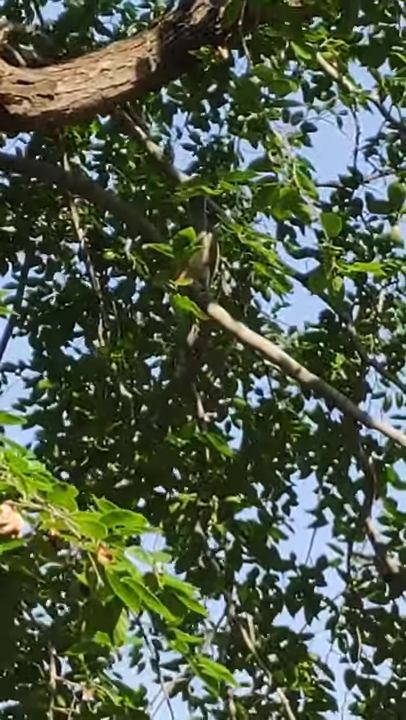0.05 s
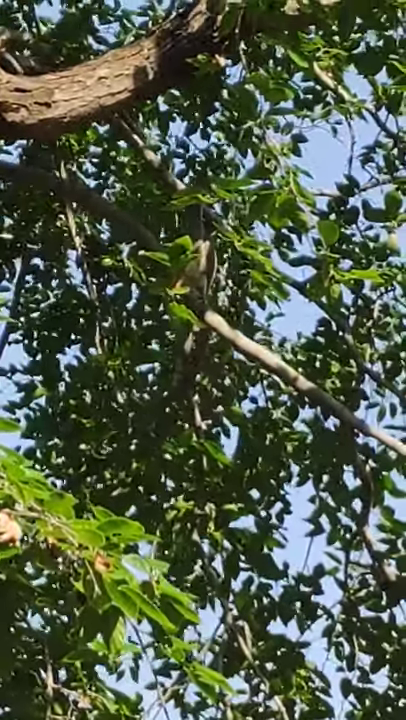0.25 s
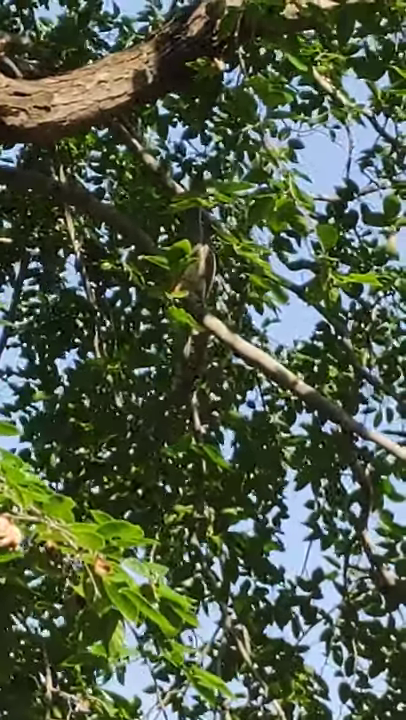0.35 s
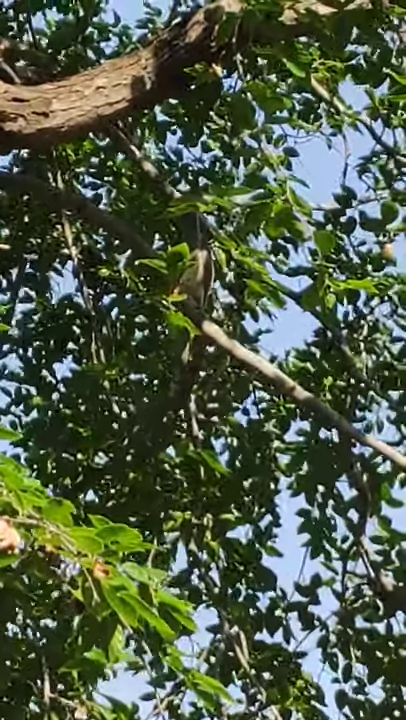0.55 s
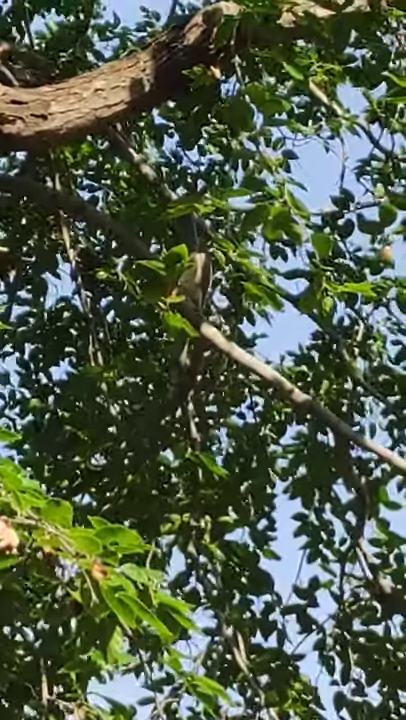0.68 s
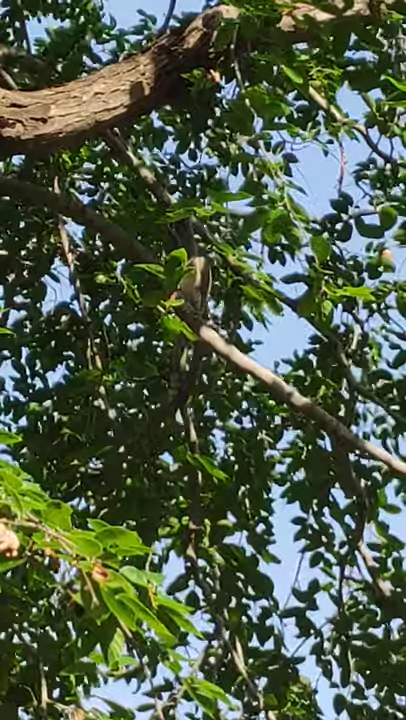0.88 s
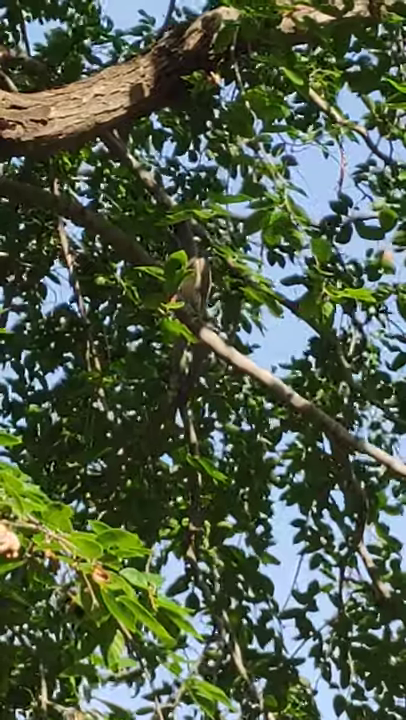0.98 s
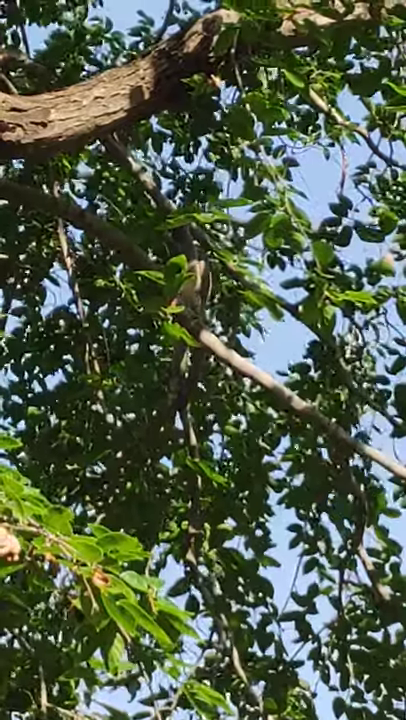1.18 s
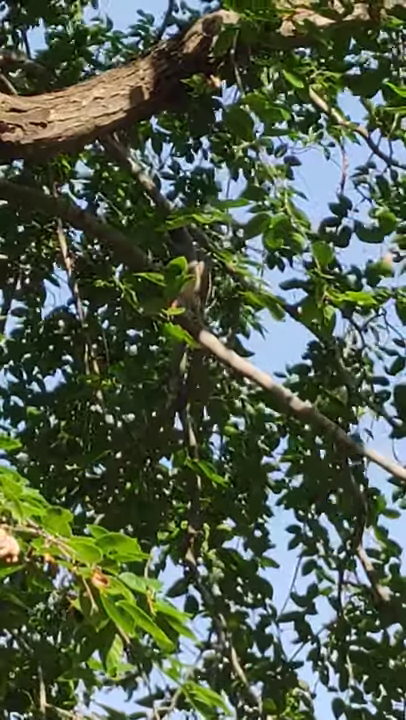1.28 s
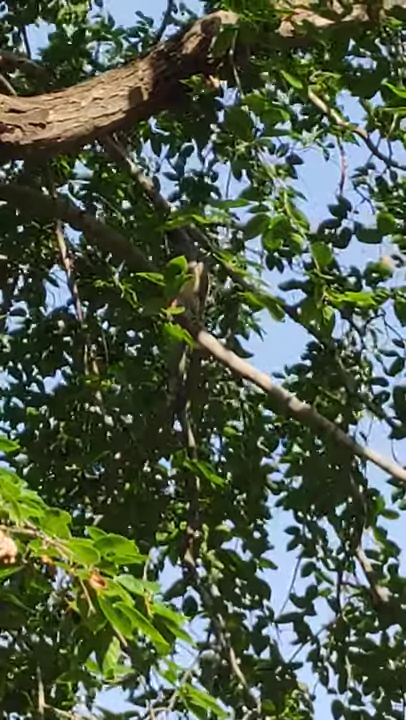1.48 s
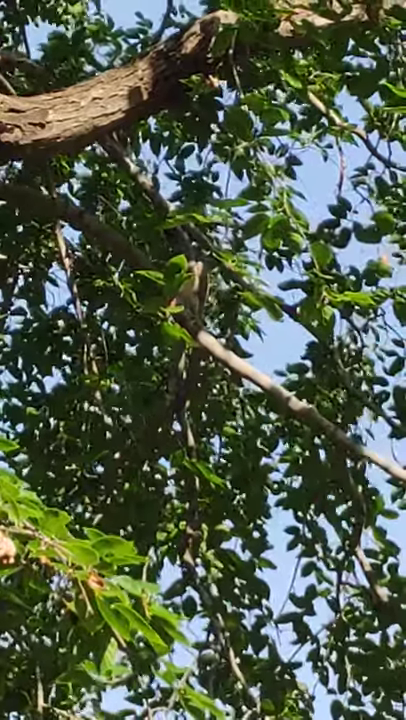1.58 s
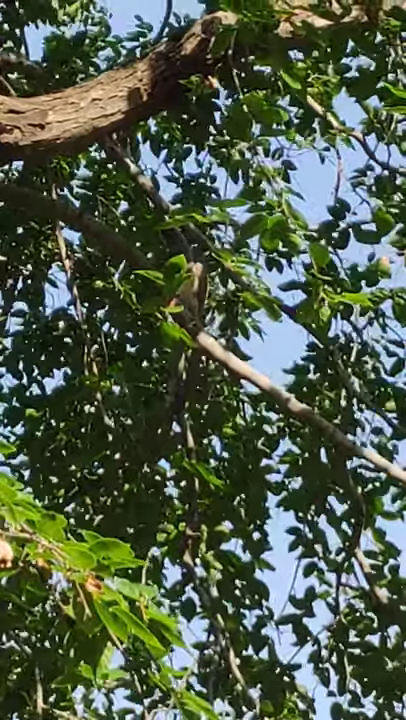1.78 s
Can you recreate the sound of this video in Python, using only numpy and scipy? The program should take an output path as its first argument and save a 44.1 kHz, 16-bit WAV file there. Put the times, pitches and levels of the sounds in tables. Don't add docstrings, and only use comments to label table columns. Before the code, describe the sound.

One sharp bird call rings out in leafy trees, followed by distant thin whistles and trills

```python
import sys
import numpy as np
from scipy import signal
from scipy.fft import rfft, irfft
from scipy.io import wavfile
from scipy.ndimage import uniform_filter1d

SR = 44100
rng = np.random.default_rng(int(sys.argv[2]) if len(sys.argv) > 2 else 0)


def materialize(psi):
    bounded = np.clip(np.atleast_2d(psi).T, -1, 1)
    quanta = np.round(bounded * 32767).astype(np.int16)
    wavfile.write(sys.argv[1], SR, quanta)


def ratio(d):
    e = np.asarray(d, float) / 20
    return 10 ** e


N = 81585


def on_log(hz, table):
    t = np.array(table, float)
    return np.interp(np.log(np.maximum(hz, 1)), np.log(t[:, 0]), t[:, 1])


def shaped(x, gain):
    return irfft(rfft(x) * gain(np.fft.rfftfreq(N, 1 / SR)), N)


def noise(gain):
    return shaped(rng.standard_normal(N), gain)


def unit(x):
    return x / np.sqrt(np.mean(x ** 2))


def walk(rate):
    k = int(SR / rate)
    return unit(uniform_filter1d(uniform_filter1d(rng.standard_normal(N), k), k))


# (frequency [Hz], level [dB])
SCATTER_COLOUR = [(1500, -1.5), (3000, -3), (4300, -1.5), (5100, 5), (8600, 2), (13000, 7), (16000, -8)]


def scatter(x, start, t60, db):
    t = np.arange(int(.7 * SR)) / SR
    fade_in = np.clip(t / start - 1, 0, 1)
    tail = rng.standard_normal((2, len(t))) * fade_in * ratio(-60 * t / t60)
    tail = tail * ratio(db) / np.sqrt(np.sum(tail ** 2, axis=1, keepdims=True))
    wet = signal.fftconvolve(x[None], tail, axes=1)[:, :N]
    return shaped(wet, lambda hz: ratio(on_log(hz, SCATTER_COLOUR)))


# (frequency [Hz], density [dB per Hz])
AIR_COLOUR = [(15, -29), (25, 6.5), (129, -8.5), (260, -17.5), (1180, -22), (1810, -31), (5320, -28.5),
              (5770, -28), (15600, -38.5)]
# (frequency [Hz], level [dB])
AIR_LEFT = [(100, -1.5), (400, -2), (2400, 1), (8000, 2), (15000, 7.5)]
# (frequency [Hz], correlation [0 to 1])
AIR_ALIKE = [(130, .97), (300, 0.92), (640, 0.7), (1400, 0.01), (15000, 0.034)]


def air():
    def alike(hz):
        return np.clip(on_log(hz, AIR_ALIKE), 0, 1)

    def ear(sign):
        def gain(hz):
            return ratio(on_log(hz, AIR_COLOUR) + sign * on_log(hz, AIR_LEFT) / 2) * (hz > 18)
        return shaped(mid + sign * side, gain)

    mid = noise(lambda hz: np.sqrt(1 + alike(hz)))
    side = noise(lambda hz: np.sqrt(1 - alike(hz)))
    ears = unit(np.array([ear(1), ear(-1)]))
    out = 0
    for octave in range(4, 15):
        band = shaped(ears, lambda hz: np.clip(1 - np.abs(np.log2(hz + 1) - octave), 0, 1))
        flicker_db = 1.3 * walk(5.5)
        out = out + band * ratio(flicker_db)
    return ratio(-56) * out


# (frequency [Hz], width [Hz], level [dB])
HUM = [
    (58.8, 47, -63.5),
    (114.5, 9.2, -74.5),
    (688, 115, -77.5),
]


def machinery():
    hum = np.zeros(N)
    for centre, width, db in HUM:
        hum = hum + ratio(db) * unit(noise(lambda hz: np.exp(-((hz - centre) / width) ** 2)))
    return hum


def far_tones(shape, calls):
    t, out = np.arange(N) / SR, np.zeros((3, N))
    s, hz, shape_db = np.array(shape, float).T
    for start, db, pan_db, factor in calls:
        pitch = factor * np.interp(t - start, s, hz)
        gain = ratio(db + np.interp(t - start, s, shape_db, left=-200, right=-200))
        tone = np.sqrt(2) * np.sin(2 * np.pi * np.cumsum(pitch) / SR) * uniform_filter1d(gain, size=80)
        out = out + np.array([tone * ratio(pan_db / 2), tone * ratio(-pan_db / 2), tone])
    return out


# (time [s], pitch [Hz], level [dB])
TICK = [(0, 7800, -6.5), (.004, 7460, -1.5), (.008, 7350, -15.5), (.011, 6800, -5), (.013, 6860, -9)]
# (time [s], level [dB], pan to left [dB], pitch factor [ratio])
TICKS = [(-.015, -65, 0, 1), (0.01, -53.5, 0.0057, 1.005), (0.04, -55, 0, 1.065), (0.068, -65, 0, 1.17),
         (0.095, -55.5, 0, 0.96), (0.124, -72, 0, 0.76), (.18, -80, 0, 1.5), (.925, -73, 0, 1.8),
         (.95, -65, 0.0081, 1.01), (.975, -73, 0, 1.04), (0.999, -69, 0, 0.87), (1.026, -73, 0, 0.93),
         (1.598, -63, 0.0025, 1.07), (1.628, -60.5, 0.0065, 1), (1.651, -68, 0, 1.2),
         (1.676, -61, 0.0013, 1.01), (1.699, -74, 0, 1.04), (1.724, -60, 0, 1), (1.748, -60.5, 0, 1.04),
         (1.772, -75, 0.00072, 1.2)]


def ticking_trill():
    return far_tones(TICK, TICKS)


# (time [s], pitch [Hz], level [dB])
CLIMB = [(0, 1880, 0), (.04, 2050, -8.5), (.062, 2280, 5), (.075, 2600, -23), (.1, 2930, 5),
         (.108, 3080, -7)]
# (time [s], level [dB], pan to left [dB], pitch factor [ratio])
CLIMBS = [
    (0.012, -79, -2, 1),
    (0.414, -78.5, -2, 0.97),
    (.815, -77.5, -1.7, 0.95),
    (1.213, -75, -2.3, 0.99),
    (1.615, -74.5, -1.8, 0.97),
]


def climbing_phrase():
    return far_tones(CLIMB, CLIMBS)


# (time [s], pitch [Hz], level [dB])
PEEP = [(0, 6000, 2), (.004, 5850, 4), (.008, 5540, -7), (.013, 6100, -4)]
# (time [s], level [dB], pan to left [dB], pitch factor [ratio])
PEEPS = [
    (0.013, -72, 1.2, 0.92),
    (.045, -64.5, 1.1, 0.98),
    (0.072, -63.5, 1, 1.06),
    (0.101, -67.5, 1.1, 0.84),
    (0.136, -69, 1, 1.01),
    (0.161, -72, 1, 0.79),
    (0.726, -70, 2.4, 0.58),
]


def peeping():
    return far_tones(PEEP, PEEPS)


# (frequency [Hz], level [dB])
THROAT = [(900, -30), (2000, -16.5), (3200, 3.5), (4300, 2.5), (5200, 4.5), (6500, -1), (8600, -3.5),
          (14000, -33.5)]
# (frequency [Hz], level [dB])
RASP = [(1500, -22), (3000, -5), (5000, 1), (9000, 5), (12000, -18), (16000, -19)]
# (level [dB]) at harmonic 1.5, 2.5, 3.5 and so on, blended between
OVERTONES = [-1, 1, 1.5, -10, -1.5, 4, -7]


def note(rows, jitter, flutter_db, rasp_db):
    n = SR // 2
    t = np.arange(n) / SR
    s, hz, db, slope = np.array(rows, float).T
    f = np.interp(t, s, hz) * (1 + jitter * walk(660)[:n])
    phase = 2 * np.pi * np.cumsum(f) / SR
    k = np.arange(1, 17)[:, None]
    flutter = np.tanh(walk(330)[(np.arange(n) + 3500 * k) % N]) * np.log2(k)
    syrinx_db = np.interp(k, np.arange(len(OVERTONES)) + 1.5, OVERTONES)
    tilt_db = np.interp(t, s, slope) * np.log2(k)
    stack = ratio(syrinx_db + on_log(k * f, THROAT) + tilt_db + flutter_db * flutter)
    smear = 0.12 * flutter[:, ::-1] * flutter_db
    stack = stack * (k * f < .36 * SR) * np.sin(k * phase + smear)
    breath = unit(noise(lambda hz: ratio(on_log(hz, RASP))))[:n]
    rasp = ratio(rasp_db) * breath * (1 + np.sin(phase))
    shimmer_db = 1.63 * walk(340)[:n]
    gain = ratio(np.interp(t, s, db, left=-200, right=-200) + shimmer_db)
    gain = uniform_filter1d(uniform_filter1d(gain, size=60), size=60)
    return np.pad(np.sqrt(2) * gain * (stack.sum(axis=0) + rasp), (0, N - n))


# (time [s], pitch [Hz], level [dB], overtone slope [dB per octave])
CREAK = [(.173, 625, -66, -7), (0.177, 679, -40.5, -8), (.185, 796, -56, -6.5), (.191, 835, -68, -13)]
SLUR = [(0.191, 1000, -67, -12), (.194, 993, -45, -7), (0.205, 977.6, -38, -6.5), (0.216, 1162, -39, -3.5),
        (.231, 1324, -34, -12), (.237, 1857, -38.5, -1), (0.244, 2540, -42, 2.5), (0.248, 2774, -42.5, -11),
        (0.258, 2814, -50, -8)]
WHISTLE = [(.25, 3937, -55, 8), (.265, 4103, -38, 1), (0.272, 4314, -49.5, 9.5), (0.283, 4292, -31, -14.5),
           (0.303, 4352, -37.5, -4), (0.309, 4262, -52.5, 13.5), (0.338, 4313, -56, -1),
           (.344, 4350, -54, -16), (.358, 4370, -43, 6)]
CHIP = [(0.356, 2670, -51, -14), (0.358, 2536, -48.5, -4), (.364, 2350, -44.5, 0), (0.367, 2157, -47, -1),
        (.372, 1687, -44.5, -3), (.379, 1490, -56.5, -4)]
# (pitch jitter [share], overtone flutter [dB per octave], rasp [dB])
ROUGHNESS = [
    (.012, 5, -19),
    (0.0049, 3, -13.5),
    (0.0016, 2, -30.5),
    (0.015, 5.5, -15),
]
# (frequency [Hz], level [dB])
NEAR_PAN = [(2000, 1.5), (5000, 4), (9000, 7), (13000, 22.5)]


def near_bird():
    call = np.zeros(N)
    for rows, rough in zip((CREAK, SLUR, WHISTLE, CHIP), ROUGHNESS):
        call = call + note(rows, *rough)
    left_lag = .000067
    left = shaped(call, lambda hz: ratio(on_log(hz, NEAR_PAN) / 2) * np.exp(-2j * np.pi * hz * left_lag))
    right = shaped(call, lambda hz: ratio(-on_log(hz, NEAR_PAN) / 2))
    leaves = scatter(call, start=0.0027, t60=0.12, db=-6)
    walls = scatter(call, start=0.02, t60=0.65, db=-11)
    return np.array([left, right]) + leaves + walls


# (time [s], pitch [Hz], level [dB])
FALL = [(.018, 4000, -14), (.028, 3850, -5), (.05, 3450, 1), (.062, 3400, -12.5), (.085, 3480, -13),
        (.1, 3600, -17), (.125, 3780, -12), (.135, 3800, -22)]
# (time [s], level [dB], pan to left [dB], pitch factor [ratio])
FALLS = [
    (0.629, -65, -1, 1),
    (1.029, -66, -0.88, 0.99),
    (1.431, -65.5, -1, 0.99),
]


def falling_phrase():
    return far_tones(FALL, FALLS)


# (time [s], pitch [Hz], level [dB])
RISE = [(0, 5420, -22), (.02, 5290, -2), (.042, 5440, 1), (.086, 5660, -4), (.094, 5950, 6),
        (.098, 5750, -26)]
# (time [s], level [dB], pan to left [dB], pitch factor [ratio])
RISES = [
    (.77, -70.5, 8.7, 1),
]


def rising_whistle():
    return far_tones(RISE, RISES)


# (time [s], pitch [Hz], level [dB])
LONG_WHISTLE = [(0, 6090, -18), (.018, 6315, -9.5), (.094, 6086, -5), (.156, 5987, -5), (.215, 5770, -13.5),
                (.275, 5690, -7), (.32, 5340, -5.5), (.356, 4955, 0), (.385, 4760, -1), (.412, 4820, -14),
                (.42, 4610, -20)]
# (time [s], level [dB], pan to left [dB], pitch factor [ratio])
LONG_WHISTLES = [
    (1.051, -63.5, 8.5, 1),
    (1.293, -70, 5.5, 0.98),
]


def long_whistle():
    return far_tones(LONG_WHISTLE, LONG_WHISTLES)


# (time [s], pitch [Hz], level [dB])
CHIRRUP = [(0, 2490, -12), (.01, 2540, -8), (.018, 2810, -1), (.025, 2950, -9), (.04, 3250, -5),
           (.05, 3560, -17)]
# (time [s], level [dB], pan to left [dB], pitch factor [ratio])
CHIRRUPS = [
    (1.172, -65, 1, 0.98),
]


def chirrup():
    return far_tones(CHIRRUP, CHIRRUPS)


# (time [s], pitch [Hz], level [dB])
HOOK = [(0, 4460, -14), (.015, 4350, -12), (.04, 4750, 4), (.1, 4780, -9), (.13, 4660, -14)]
# (time [s], level [dB], pan to left [dB], pitch factor [ratio])
HOOKS = [
    (1.21, -75, 2, 1),
]


def hooked_note():
    return far_tones(HOOK, HOOKS)


DEPTH = [
    -4.5,
    -1,
    6.5,
    5.5,
    5.5,
    3.5,
    6,
    0.5,
]
LEFT_LAG = [15, 15, 0, 0, 0, 0, 0, 0]


def far_birds():
    direct, wet = np.zeros((2, N)), np.zeros(N)
    fading_db = 2.1 * np.array([walk(43), walk(40)])
    birds = (long_whistle(), rising_whistle(), falling_phrase(), climbing_phrase(),
             ticking_trill(), peeping(), chirrup(), hooked_note())
    for (left, right, song), depth_db, lag in zip(birds, DEPTH, LEFT_LAG):
        direct = direct + np.array([np.roll(left, lag), right]) * ratio(-depth_db / 2)
        wet = wet + song * ratio(depth_db / 2)
    return direct * ratio(fading_db) + scatter(wet, start=0.0018, t60=0.43, db=-2.5)


def scene():
    return air() + machinery() + far_birds() + near_bird()


def top_cut(x):
    return signal.sosfilt(signal.butter(12, 15770, fs=SR, output="sos"), x)


def record(dry):
    mix = shaped(dry, lambda hz: hz < 15770)
    return top_cut(mix)


dry = scene()
out = record(dry)
materialize(out)
```